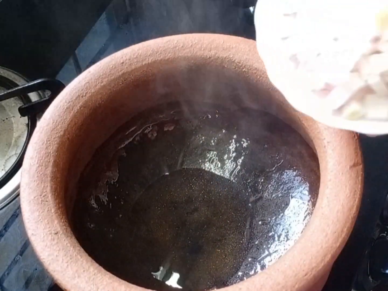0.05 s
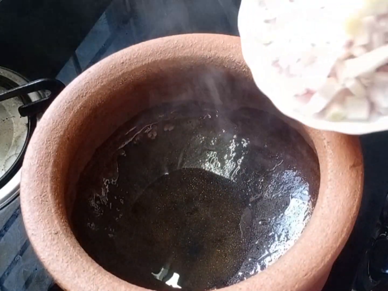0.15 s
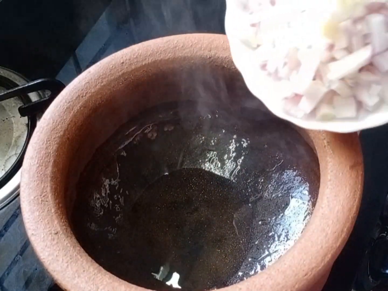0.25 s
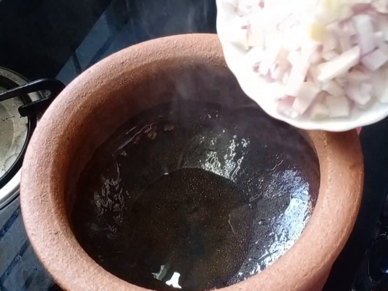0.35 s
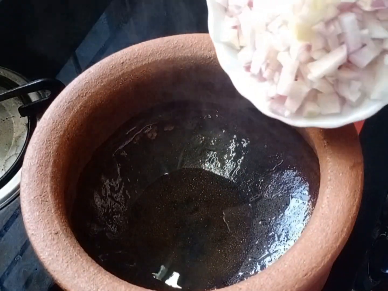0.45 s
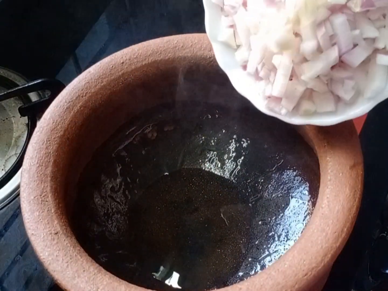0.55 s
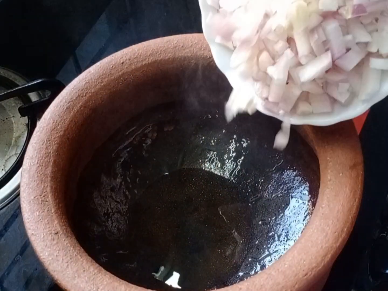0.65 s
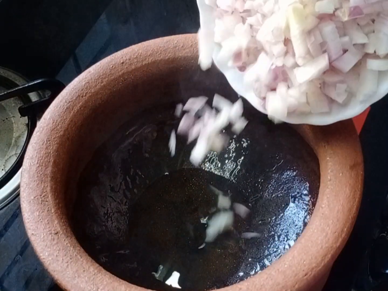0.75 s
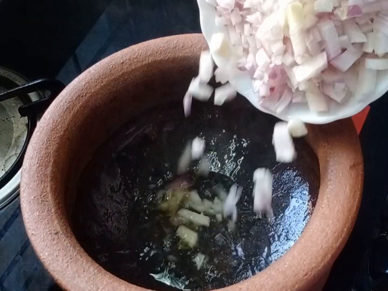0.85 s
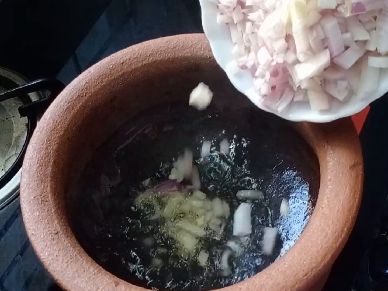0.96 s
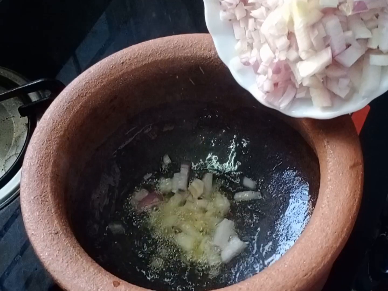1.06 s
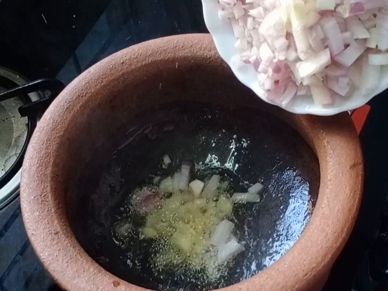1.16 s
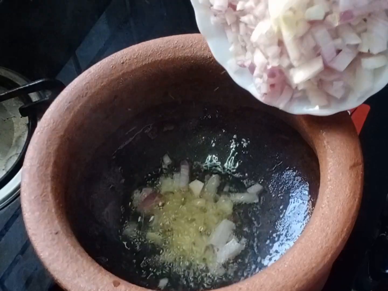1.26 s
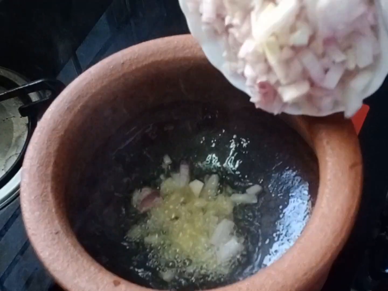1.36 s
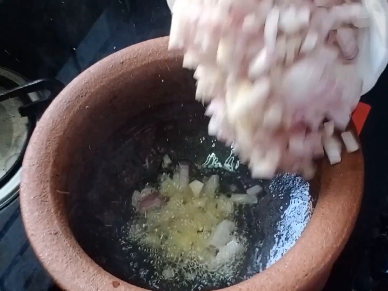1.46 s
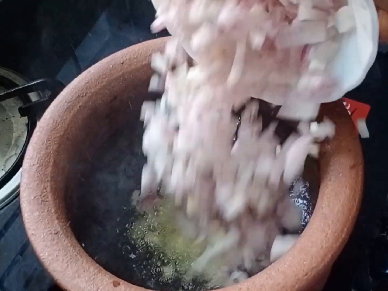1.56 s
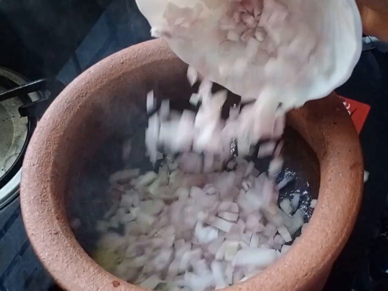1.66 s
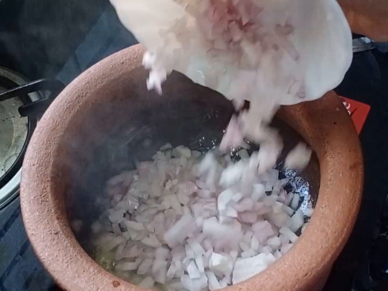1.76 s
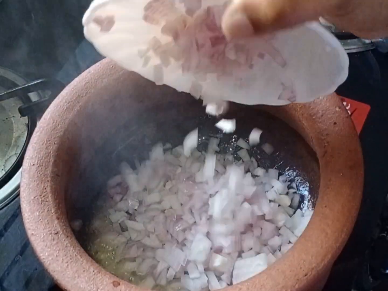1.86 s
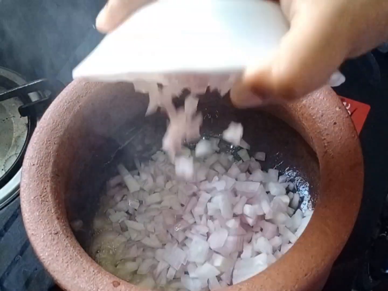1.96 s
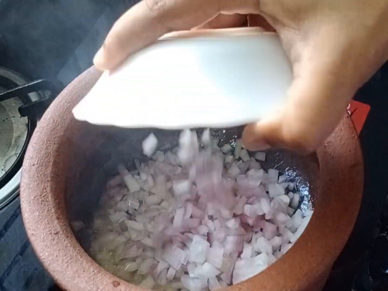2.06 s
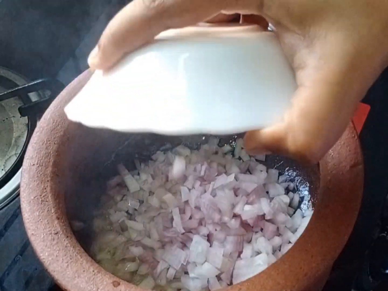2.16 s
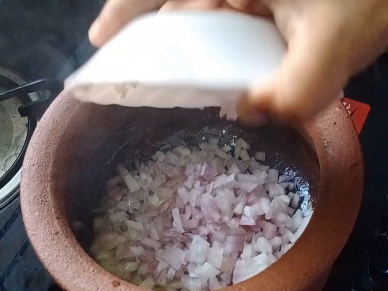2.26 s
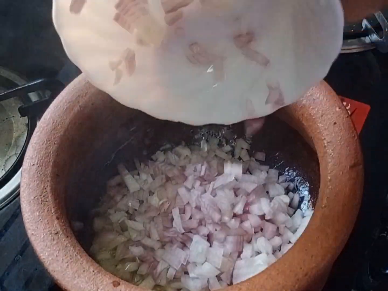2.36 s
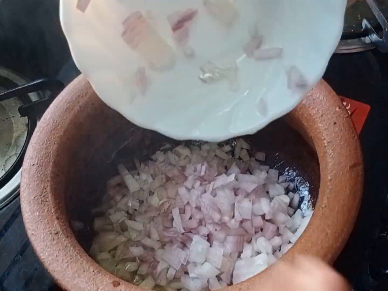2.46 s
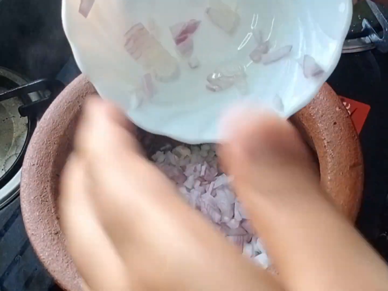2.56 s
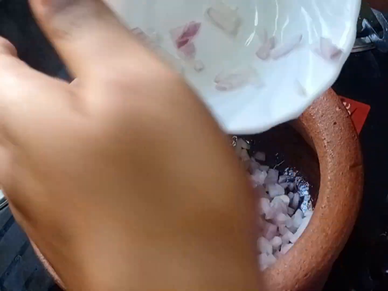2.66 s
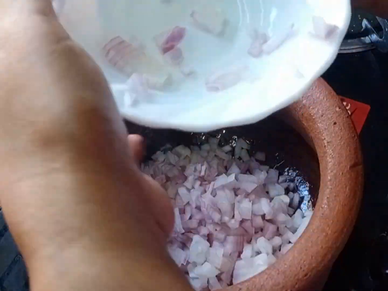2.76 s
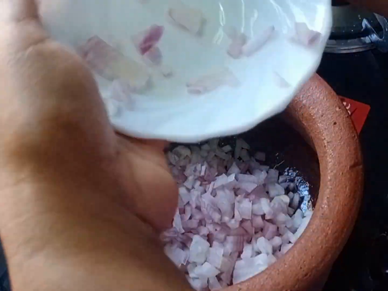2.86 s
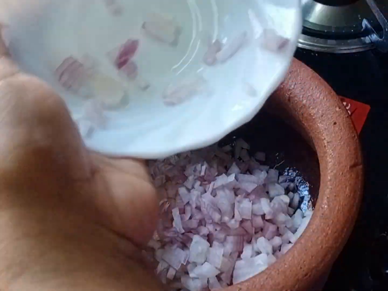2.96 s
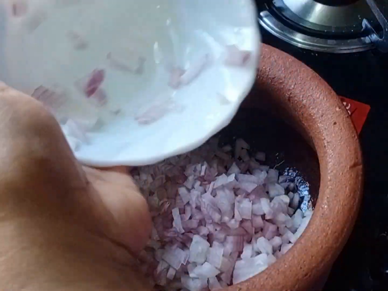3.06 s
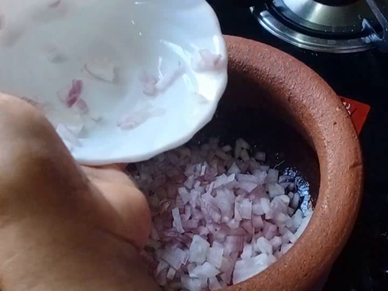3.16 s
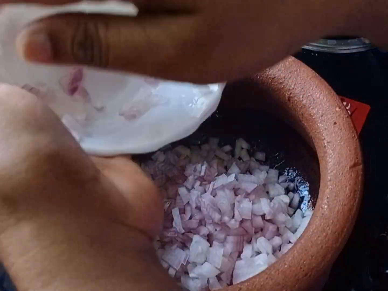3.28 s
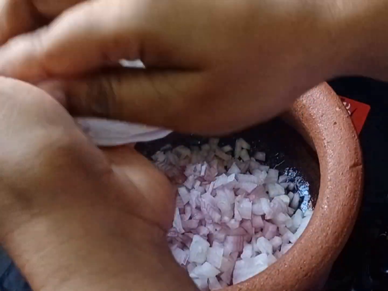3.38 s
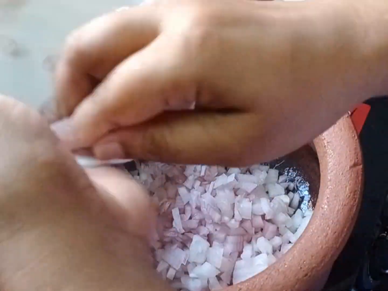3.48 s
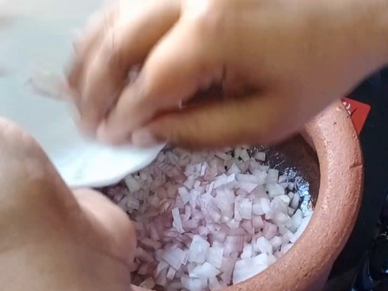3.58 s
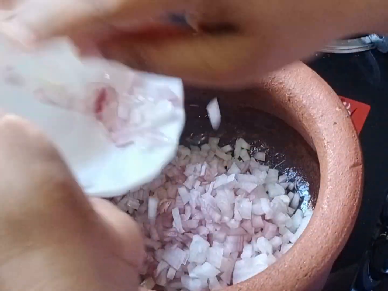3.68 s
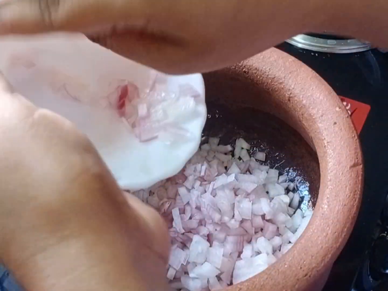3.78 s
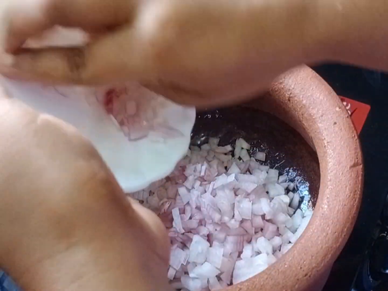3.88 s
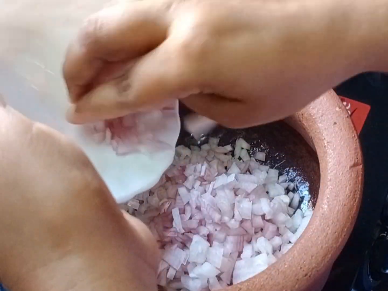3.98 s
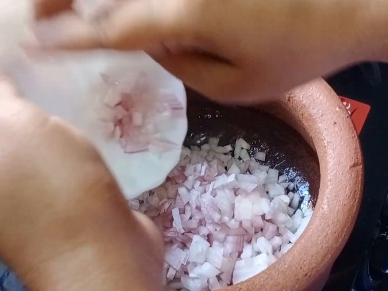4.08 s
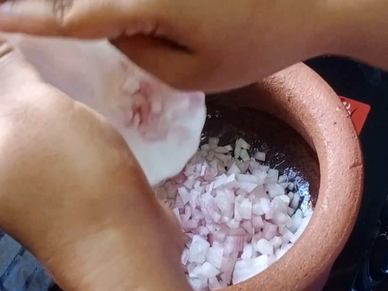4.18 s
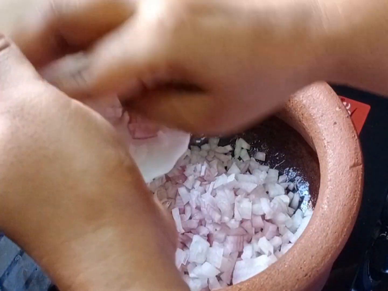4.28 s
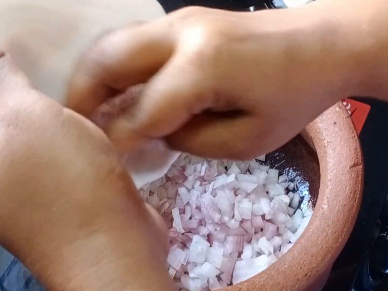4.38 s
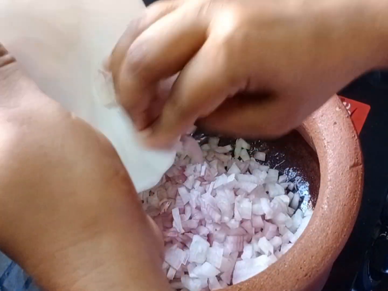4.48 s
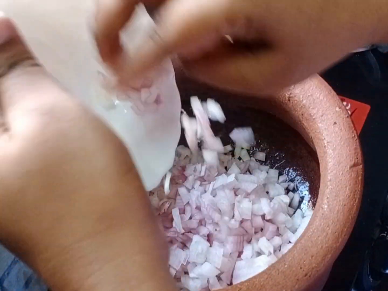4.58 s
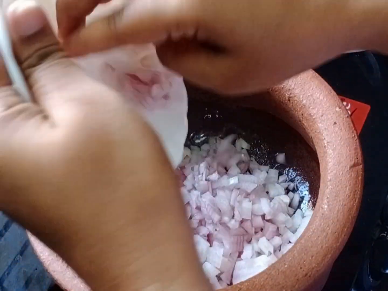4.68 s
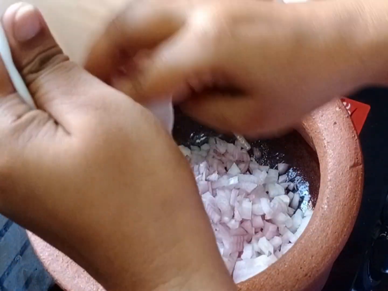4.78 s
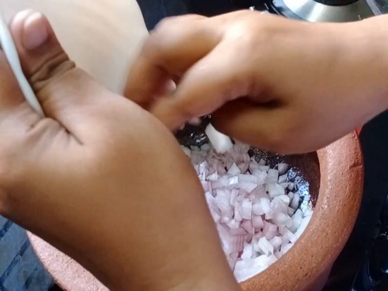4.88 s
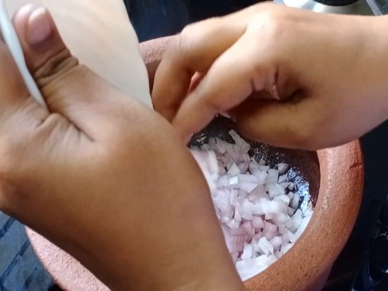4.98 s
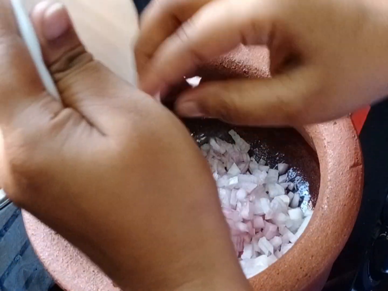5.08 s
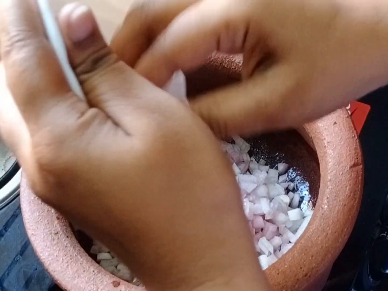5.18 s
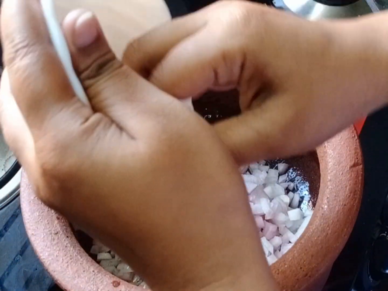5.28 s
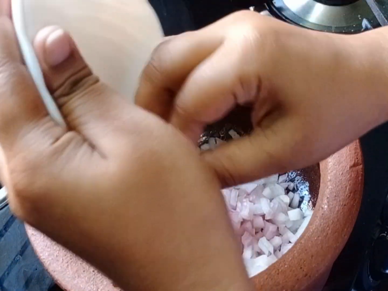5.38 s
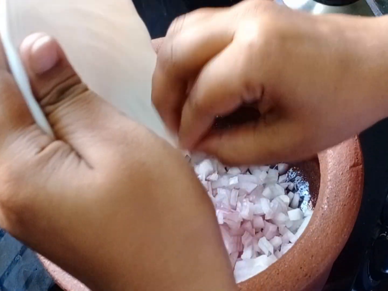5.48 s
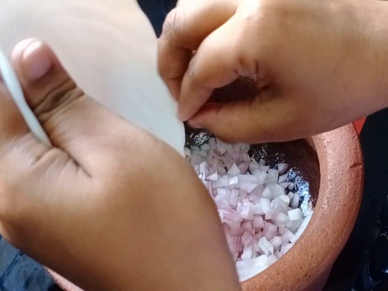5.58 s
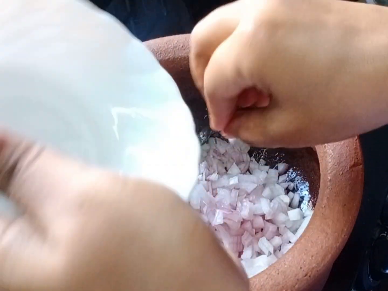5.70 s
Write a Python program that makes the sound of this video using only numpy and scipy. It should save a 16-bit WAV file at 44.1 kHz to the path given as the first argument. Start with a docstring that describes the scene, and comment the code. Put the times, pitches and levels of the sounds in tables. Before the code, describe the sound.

Chopped onion drops into hot oil in a clay pot, bursting into a dense crackling sizzle with sharp pops, then settling to a thinner fry.

```python
"""Fingers shift on a plate over a low wavering drone; then chopped onion drops into hot oil in a clay pot.
A few pieces plop and fizz first, then the whole heap: filtered noise and short decaying rings make a dense
crackle of steam bubbles, coloured by the pot's resonances. Single pops stand out, and drops spit onto the
close microphone as ticks and bass pushes; its gain ducks. The frying settles while fingers wipe the plate."""
import sys
import numpy as np
from scipy import signal
from scipy.fft import rfft, irfft, next_fast_len
from scipy.io import wavfile
from scipy.ndimage import uniform_filter1d, map_coordinates

SR = 44100
rng = np.random.default_rng(int(sys.argv[2]) if len(sys.argv) > 2 else 0)


def wav_out(sig):
    """Save sig, one row per channel (or a flat mono array), as 16-bit PCM at SR to the path in sys.argv[1]."""
    wavfile.write(sys.argv[1], SR, np.round(np.clip(np.atleast_2d(sig).T, -1, 1) * 32767).astype(np.int16))


N = 253134

FIRST_CONTACT_S, COOLING_FROM_S = 0.813, 2.443
POT_FILLED_S = 2  # middle of the shift in pot resonances
TOP_HZ = 15900  # upper band limit

# relative spectrum of each bubble size: freq_hz, level_db (per Hz)
LARGE = [(170, -25), (310, -17), (540, -10.5), (1000, -11.5), (1400, -1.5), (2100, -5), (2700, 2),
         (4000, -58)]
MEDIUM = [(1200, -78), (2000, -24), (2800, -5.5), (4200, -1), (5200, -1), (6800, 4), (7700, 2),
          (9200, -13.5), (11000, -13), (13000, -32)]
SMALL = [(8000, -114), (10000, -18.5), (11600, -12), (12800, -4), (14500, 1.5), (15600, 4), (17000, -23)]
# how hard water boils off the onion; it dips briefly near 1.57 s: time_s, level_db
BOIL = [(0.84, -33), (0.92, -32.5), (1.2, -28), (1.36, -26.0), (1.5, -28), (1.57, -34.5), (1.62, -27.0),
        (1.8, -26.0), (1.97, -28.5), (2.3, -26), (2.42, -29.5), (2.9, -30.5), (3.12, -31.5), (3.65, -35),
        (4.2, -34), (4.45, -36.5), (5.0, -35.5), (5.68, -38.5)]


def sizzle(large_db=-12.0, medium_db=-3.0, small_db=-4.5, large_rise_s=0.15, rise_s=0.029,
           fresh_db=3.5, fresh_decay_s=0.35, cooling_db=15, cooling_s=1.1):
    """One boil drives all bubble sizes: fine fizz leads; large bubbles come last and die away first."""
    large, medium, small = crackle()
    # the first pieces fizz finely in the hottest oil
    age_s = np.maximum(seconds(N) - FIRST_CONTACT_S, 0)
    fizz_tilt_db = fresh_db * np.exp(-age_s / fresh_decay_s)
    # the heap cools the oil
    cooled_db = cooling_db * ramp(COOLING_FROM_S, cooling_s)
    large = large * amp(large_db - fizz_tilt_db - cooled_db) * ramp(FIRST_CONTACT_S, large_rise_s)
    medium = settling(medium) * amp(medium_db - fizz_tilt_db)
    small = small * amp(small_db + fizz_tilt_db)
    boil_db = np.interp(seconds(N), *np.transpose(BOIL))
    return ramp(FIRST_CONTACT_S, rise_s) * amp(boil_db) * (large + medium + small)


def crackle(count=14000, spread_db=3.0, own_db=2.5, hiss_db=-1.0, clump_db=0.92, sputter_db=1.38,
            flicker_db=0.84, gurgle_db=3.5, boil_db=1.7, patchy_db=2.6):
    """Bubbles burst at random times, in clumps, over a steady hiss in each size band; the largest gurgle
    unevenly."""
    starts = rng.integers(0, N, count)
    strength_db = spread_db * np.minimum(rng.standard_normal(count), 2)  # shared by the three sizes
    clumps_db = clump_db * wobble(rate_hz=110) + sputter_db * wobble(rate_hz=45)

    def sizes():
        own_strength_db = own_db * np.minimum(rng.standard_normal(count), 1)
        return amp(strength_db + own_strength_db) * rng.choice([-1, 1], count)

    def layer(ticks, spectrum, depth_db):
        hiss = amp(hiss_db) * rng.standard_normal(N)
        steam = (ticks + hiss) * amp(clumps_db + flicker_db * wobble(rate_hz=170))
        coloured = filtered(steam, lambda f: colour(spectrum, f))
        return unit(pot(patchy(coloured, depth_db)))

    large = layer(bubbles(starts, sizes(), pitch_hz=1545, spread=0.4, cycles=0.55), LARGE, gurgle_db)
    medium = layer(bubbles(starts, sizes(), pitch_hz=5360, spread=0.34, cycles=0.74), MEDIUM, boil_db)
    small = layer(bubbles(starts, sizes(), pitch_hz=14000, spread=0.12, cycles=3), SMALL, patchy_db)
    return large, medium, small


def bubbles(starts, sizes, pitch_hz, spread, cycles):
    """Each bubble is a sine at its own pitch, falling by 1/e in the given cycles; sum has rms 1."""
    age = np.arange(80)  # samples
    pitches_hz = pitch_hz * np.exp(spread * rng.standard_normal((len(starts), 1)))
    turns = np.minimum(pitches_hz, SR / 2.5) * age / SR
    rings = sizes[:, None] * np.sin(2 * np.pi * turns) * np.exp(-turns / cycles)
    positions = starts[:, None] + age
    return unit(np.bincount(positions.ravel(), rings.ravel(), N + len(age))[:N])


def settling(x, settle_s=2.74):
    """As the frying settles, medium bubbles shrink and bursts lose their low end."""
    # freq_hz, gain_db
    settled_gain = [(2000, -10), (3000, -7), (4500, -1.5), (6500, 2)]
    settled = ramp(COOLING_FROM_S, settle_s)
    return (1 - settled) * x + settled * filtered(x, lambda f: colour(settled_gain, f))


def pot(x):
    """Air resonances of the hollow lift narrow bands; they shift as the heap fills the pot."""
    # nearly empty, then filled: centre_hz, width_hz (before narrowing by half the lift), lift_db
    hollow_empty = [(551, 234, 14), (1465, 120, 8), (2300, 210, 5.5), (2753, 47, 7), (4140, 59, 2)]
    hollow_filled = [(635, 96, 11.7), (1354, 156, 13.2), (2120, 160, 10), (2845, 80, 7.4), (3850, 180, 2.8)]

    def ring(modes):
        def response(f):
            return 1 + sum((amp(db) - 1) * resonance(f, hz, w / amp(db / 2)) for hz, w, db in modes)
        return filtered(x, response)

    filled = np.clip((seconds(N) - POT_FILLED_S) / 0.99 + 0.5, 0, 1)
    return (1 - filled) * ring(hollow_empty) + filled * ring(hollow_filled)


def pops(body_db=-21, crack_db=-14, snap_t60_s=0.0036, fizz_t60_s=0.0031):
    """Trapped water bursts in snaps with a bright fizz, some individually timed, others at random."""
    # individually timed bursts, loud and soft, levels before colouring: start_s, snap_db, fizz_db
    timed_bursts = [(0.9246, -34, -25), (0.9611, -36, -27), (1.1412, -36, -31), (1.3628, -54, -16.5),
                    (1.455, -28.5, -40), (1.6798, -30, -38), (1.719, -27.5, -35), (1.8542, -23, -28),
                    (1.9104, -23.5, -29), (2.0658, -30, -38), (2.074, -22, -39), (2.2094, -11, -22),
                    (2.3313, -13, -32), (2.4451, -17.5, -24), (2.5144, -17.5, -12), (2.5792, -26, -32),
                    (2.9185, -39, -42), (3.04, -30, -35), (3.1701, -27.5, -40), (3.7789, -32.5, -40),
                    (3.8906, -37, -24), (4.2331, -32.5, -29), (4.9262, -32, -28), (5.0074, -36, -28.5),
                    (5.1567, -26.5, -25), (5.2623, -31, -51), (5.3387, -33, -29), (5.3675, -39.5, -26),
                    (5.6394, -33, -42)]
    snaps, fizzes = np.zeros(N), np.zeros(N)
    for s, snap_db, fizz_db in list(spits()) + list(timed_bursts):
        add(snaps, s, amp(snap_db) * burst(hz=rng.uniform(4700, 7090), t60_s=snap_t60_s))
        add(fizzes, s, amp(fizz_db) * burst(hz=rng.uniform(12500, 16700), t60_s=fizz_t60_s))
    snaps = filtered(snaps, lambda f: colour(MEDIUM, f) + amp(body_db) * colour(LARGE, f))
    fizzes = filtered(fizzes, lambda f: colour(SMALL, f) + amp(crack_db) * (f / TOP_HZ))
    return pot(settling(snaps) + fizzes)


def spits(count=90, snap_db=-2, fizz_db=-4, spread_db=3, fizz_spread_db=4, emerge_db_per_s=-0.94):
    """Bursts at random times follow the boil level plus a slope: start_s, snap_db, fizz_db."""
    when, snap, fizz = rng.uniform(-1, 1, (count, 3)).T
    s = np.interp(when, [-1, 1], [BOIL[1][0], N / SR])
    level_db = np.interp(s, *np.transpose(BOIL)) + emerge_db_per_s * (s - POT_FILLED_S)
    snaps_db = level_db + snap_db + spread_db * snap
    fizzes_db = level_db + fizz_db + fizz_spread_db * fizz
    return np.transpose([s, snaps_db, fizzes_db])


def burst(hz, t60_s, spray_db=-6, spray_t60_s=0.0064):
    """A decaying sine snap with a brief noise spray; rms 1."""
    t = seconds(count=256)
    ring = np.sin(2 * np.pi * hz * t) * amp(-60 * t / t60_s)
    spray = amp(spray_db - 60 * t / spray_t60_s) * rng.standard_normal(len(t))
    return unit(ring + spray)


def plop(rough_rad=0.47, attack_s=0.0024):
    """The first pieces hit the oil: decaying sines roughened by random phase."""
    # pitch_hz, level_db, t60_s
    plop_modes = [(1940, -43, 0.5), (2290, -30.5, 0.19), (2550, -34, 0.21), (2570, -46, 0.23),
                  (3530, -34.5, 0.089), (4597, -35, 0.077)]
    age_s = np.maximum(seconds(N) - FIRST_CONTACT_S, 0)
    ring = np.zeros(N)
    for hz, db, t60_s in plop_modes:
        phase = 2 * np.pi * hz * age_s + rough_rad * wobble(rate_hz=460)
        ring += amp(db - 60 * age_s / t60_s) * np.sin(phase)
    return (1 - np.exp(-age_s / attack_s)) * ring


def splutters(width_ratio=0.39):
    """Steam squeezes out from under a wet piece: resonant noise rises quickly and falls slower."""
    # start_s, length_s (peak at a quarter of it), centre_hz, level_db
    steam_puffs = [(0.805, 0.12, 2600, -50), (0.835, 0.06, 2240, -44), (0.86, 0.02, 3720, -35.5),
                   (1.388, 0.029, 2830, -24.5), (1.599, 0.036, 3530, -29.5), (2.862, 0.0042, 3870, -20.5),
                   (4.691, 0.049, 3570, -36.5), (5.01, 0.026, 3900, -39), (5.14, 0.056, 5600, -34.5)]
    out = np.zeros(N)
    for s, length_s, hz, db in steam_puffs:
        u = np.maximum(seconds(N) - s, 0) / (length_s / 4)
        out += amp(db) * u * np.exp(1 - u) * narrow_noise([(hz, hz * width_ratio, 0)])
    return out


def drops(port_hz=105, damping_hz=110, rise_s=0.000067, fall_s=0.00086, tick_db=-29):
    """Each oil drop ticks and pushes the microphone once; the push swings back through its bass roll-off."""
    # start_s, push_db (peak before the roll-off), direction (sign)
    drop_hits = [(1.0413, -16, -1), (1.1228, -23.5, -1), (1.1597, -0.5, -1), (1.552, -37, 1),
                 (2.0046, -12, 1), (2.2092, -2, 1)]
    t = seconds(count=1024)
    push = (1 - np.exp(-t / rise_s)) * np.exp(-t / fall_s)
    pushes, ticks = np.zeros(N), np.zeros(N)
    for s, db, direction in drop_hits:
        add(pushes, s, np.sign(direction) * amp(db) * push / push.max())
        add(ticks, s, amp(tick_db) * burst(hz=13800, t60_s=0.003))
    return ticks + filtered(pushes, lambda f: resonance(f, port_hz, damping_hz) * 1j * f / damping_hz)


def wipes():
    """Wet fingers shift on and rub the plate: soft swells of narrow, faintly pitched noise."""
    # start_s, length_s, pitch_hz, level_db
    strokes = [(0, 0.089, 603, -65), (0.007, 0.081, 880, -65), (0.274, 0.066, 2150, -67.5),
               (3.777, 0.26, 818, -64.5), (3.894, 0.17, 521, -61.5), (4.558, 0.27, 780, -57.5),
               (4.655, 0.1, 1610, -62), (4.648, 0.13, 2360, -53)]
    return sum(amp(db) * hump(s, length_s) * narrow_noise([(hz, hz / 16, 0)])
               for s, length_s, hz, db in strokes)


def kitchen(room_db=-69, drone_db=-69, waver_db=3, rumble_hz=80):
    """Faint coloured room noise and a low resonant-noise drone that wavers and now and then swells."""
    # room spectrum: freq_hz, level_db (relative, per Hz)
    room_spectrum = [(18, -57), (30, -5), (86, -8), (149, -2), (204, -10), (415, -15), (486, -10.5),
                     (649, -20.5), (1350, -15.5), (5170, -29), (7670, -31), (9220, -51), (16000, -37)]
    # drone: centre_hz, width_hz (widened in narrow_noise), level_db (relative)
    drone_modes = [(89, 31, -13.5), (137.3, 26.6, -1.5)]
    # separate drone swells: middle_s, length_s, level_db
    drone_swells = [(0.61, 0.65, -56.5), (0.848, 0.12, -50.5), (2.537, 0.5, -55), (3.177, 0.4, -54.5),
                    (3.88, 0.32, -68), (4.69, 0.47, -57), (5.085, 0.23, -50), (5.618, 0.25, -52)]
    air = unit(filtered(rng.standard_normal(N),
                        lambda f: colour(room_spectrum, f) * f / np.hypot(f, rumble_hz)))
    swells = sum(amp(db) * hump(s - length_s / 2, length_s) for s, length_s, db in drone_swells)
    drone_gain = amp(drone_db + waver_db * wobble(rate_hz=2.7)) + swells
    drone = drone_gain * narrow_noise(drone_modes)
    return amp(room_db) * patchy(air, depth_db=2.5) + drone


def scatter(x, t60_s):
    """Dense random reflections of unit energy, decaying exponentially."""
    t = seconds(count=8192)
    tail = rng.standard_normal(len(t)) * amp(-60 * t / t60_s)
    return signal.fftconvolve(x, tail / np.linalg.norm(tail))[:N]


def patchy(x, depth_db):
    """Random gain patches, a few hundred Hz wide and some 40 ms long."""
    z = signal.stft(x, nperseg=512)[2]
    field = uniform_filter1d(rng.standard_normal(z.shape), size=4, axis=0)
    field = uniform_filter1d(field, size=7, axis=1)
    return signal.istft(z * amp(depth_db * unit(field)), nperseg=512)[1][:N]


def narrow_noise(modes):
    """Noise of rms 1 in steep-sided resonances: each is squared, so its width is raised by 1.26."""
    def response(f):
        return sum(amp(db) * resonance(f, hz, w * 1.26) ** 2 for hz, w, db in modes)
    return unit(filtered(rng.standard_normal(N), response))


def resonance(f, centre_hz, width_hz):
    """Response of a causal resonance with gain 1 at its centre."""
    return 1j * f * width_hz / (centre_hz ** 2 - f ** 2 + 1j * f * width_hz)


def filtered(x, response):
    """x filtered by a complex response of frequency in Hz."""
    m = next_fast_len(N + SR // 4)
    return irfft(rfft(x, m) * response(np.fft.rfftfreq(m, 1 / SR)), m)[..., :N]


def colour(points, hz):
    """Gain from freq_hz, level_db points on a log frequency axis."""
    f, db = np.transpose(points)
    return amp(np.interp(np.log(hz + 1), np.log(f), db))


def wobble(rate_hz):
    """A smooth random curve through rate_hz knots a second."""
    return map_coordinates(rng.standard_normal(4096), [seconds(N) * rate_hz], mode="mirror")


def hump(start_s, length_s):
    """A smooth sine-squared rise and fall."""
    return np.sin(np.pi * ramp(start_s, length_s)) ** 2


def ramp(start_s, length_s):
    """A linear rise from 0 to 1."""
    return np.clip((seconds(N) - start_s) / length_s, 0, 1)


def add(track, start_s, sound):
    """Mix a sound into the track in place."""
    part = track[max(round(start_s * SR), 0):][:len(sound)]
    part += sound[:len(part)]


def amp(db):
    """Amplitude ratio of a level in dB."""
    return 10 ** (np.asarray(db) / 20)


def unit(x):
    """x scaled to rms 1."""
    return x / np.sqrt(np.mean(x ** 2) + 1e-20)


def seconds(count):
    """Times of the first count samples."""
    return np.arange(count) / SR


def scene(walls_db=-10, pops_side_db=-14):
    """Nearly mono; a faint independent side layer of crackle and pops gives slight width."""
    # side against mid crackle: freq_hz, level_db
    side_gain = [(6500, -148), (8000, -38), (9200, -6.5), (11500, -7), (12500, -55), (14000, -84)]
    frying = sizzle() + pops() + plop() + splutters()
    reflections = amp(walls_db) * scatter(frying, t60_s=0.1)
    mid = frying + reflections + drops() + wipes() + kitchen()
    # fresh draws decorrelate the side from the mid
    side_crackle = filtered(sizzle(), lambda f: colour(side_gain, f))
    side_pops = amp(pops_side_db) * filtered(pops(), lambda f: f > 4000)
    side = side_crackle + side_pops
    return np.array([mid + side, mid - side])


def record(dry, threshold_db=-14, squeeze=1.0, release_db_per_s=150, look_ahead_s=0.0031):
    """The gain ducks just ahead of a loud burst and creeps back; then the band limit."""
    t = seconds(N)
    power = uniform_filter1d(dry[0] ** 2, size=44)  # 1 ms, left channel drives both
    level_db = 10 * np.log10(np.abs(power) + 1e-12)
    over_db = np.interp(t + look_ahead_s, t, np.maximum(level_db - threshold_db, 0))
    # instant attack, linear release in dB
    released_db = release_db_per_s * t
    held_db = np.maximum.accumulate(over_db + released_db) - released_db
    duck_db = uniform_filter1d(held_db, size=88)  # 2 ms
    ducked = dry * amp(-squeeze * duck_db)
    return filtered(ducked, lambda f: np.clip((TOP_HZ - f) / 300 + 0.5, 0, 1))


dry = scene()
out = record(dry)
wav_out(out)
```